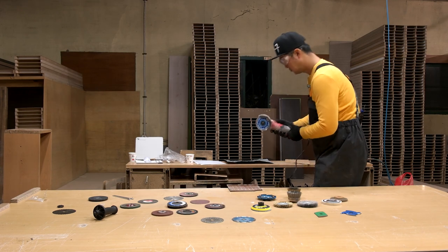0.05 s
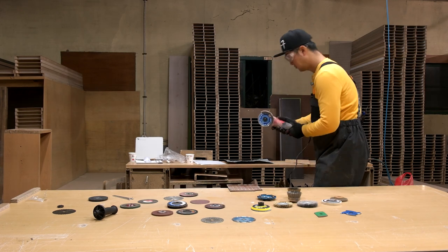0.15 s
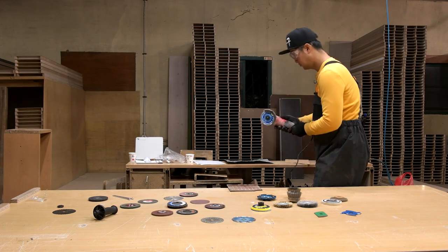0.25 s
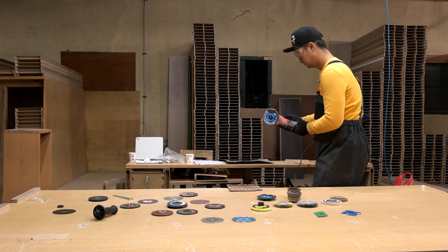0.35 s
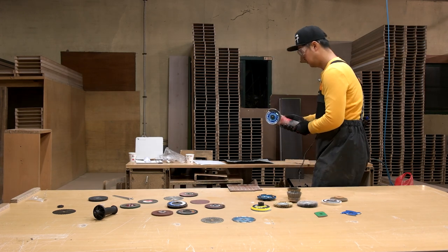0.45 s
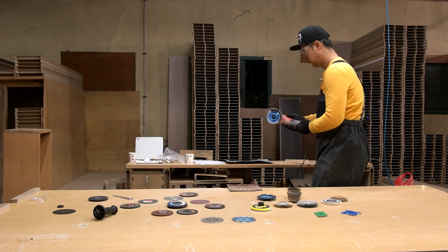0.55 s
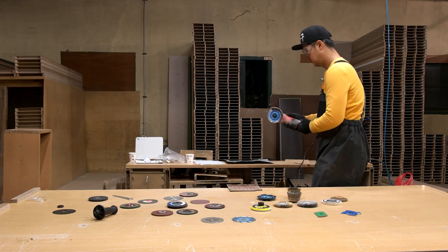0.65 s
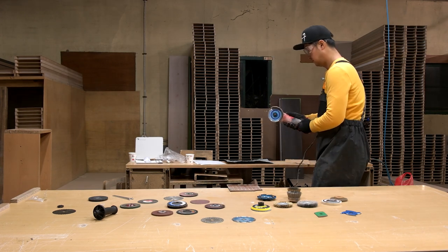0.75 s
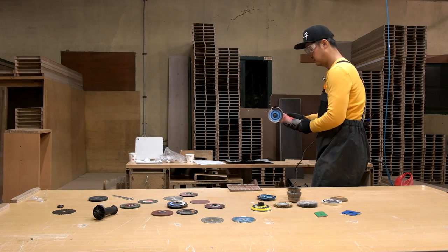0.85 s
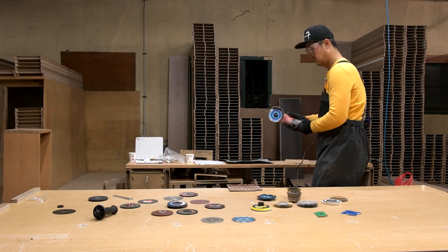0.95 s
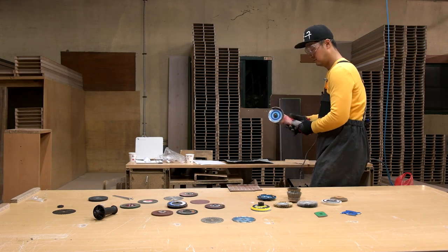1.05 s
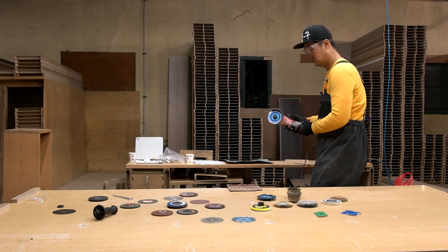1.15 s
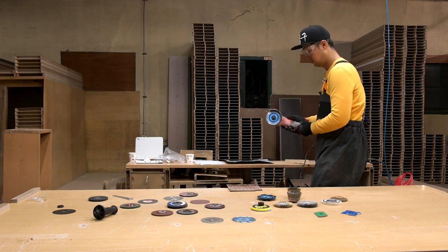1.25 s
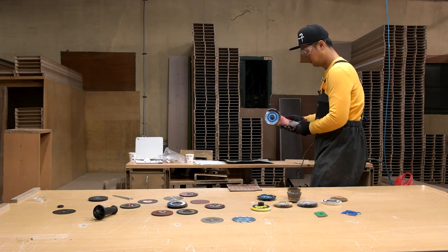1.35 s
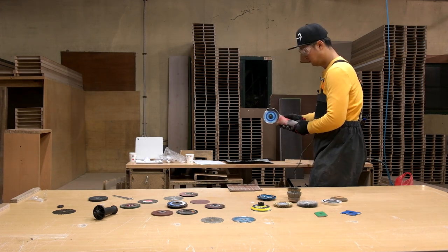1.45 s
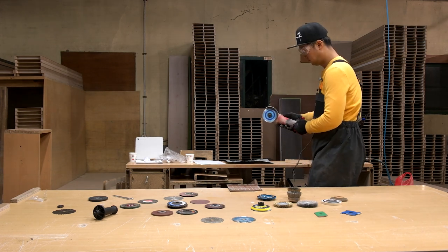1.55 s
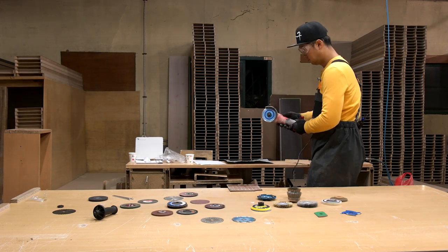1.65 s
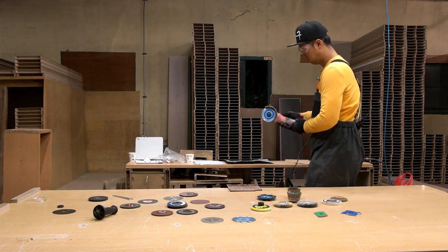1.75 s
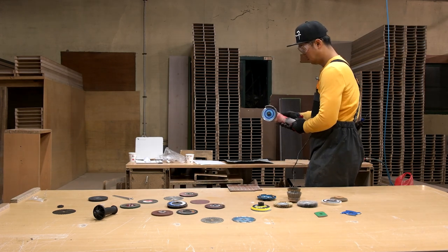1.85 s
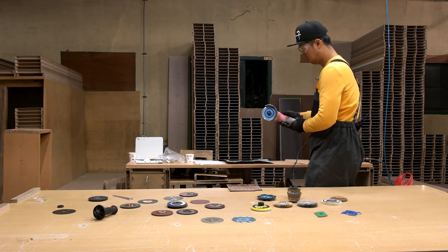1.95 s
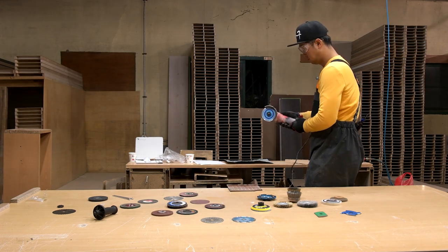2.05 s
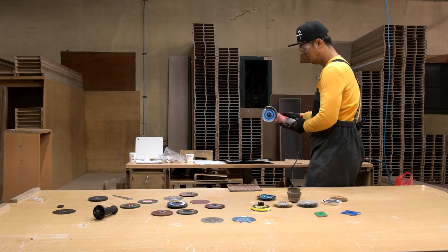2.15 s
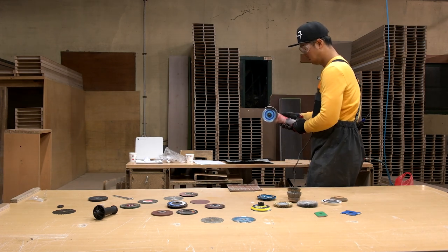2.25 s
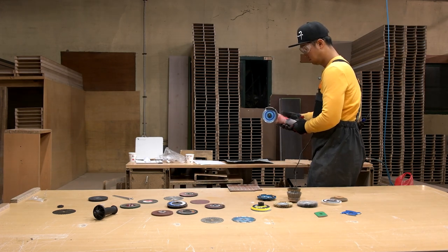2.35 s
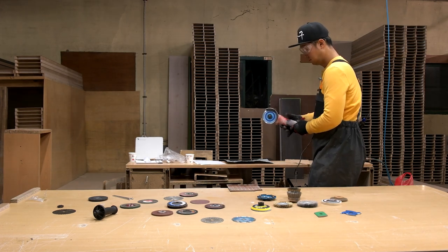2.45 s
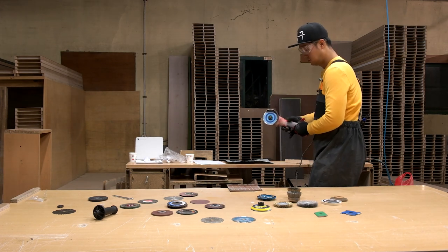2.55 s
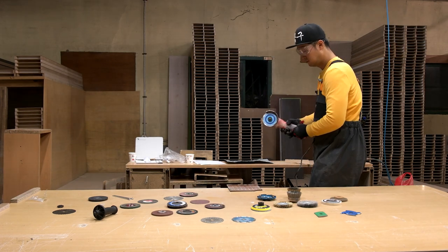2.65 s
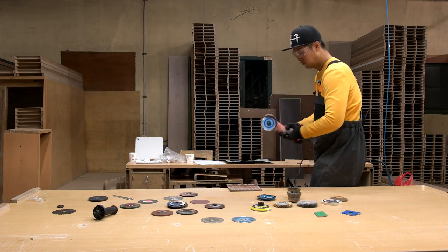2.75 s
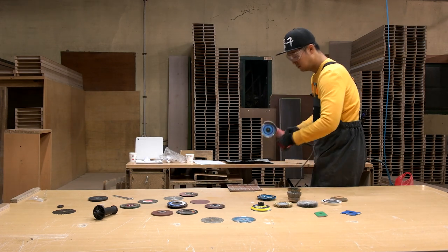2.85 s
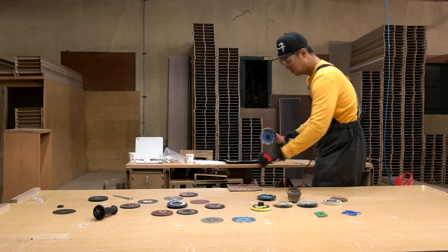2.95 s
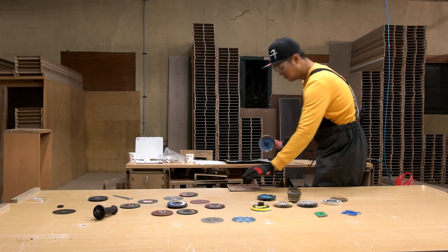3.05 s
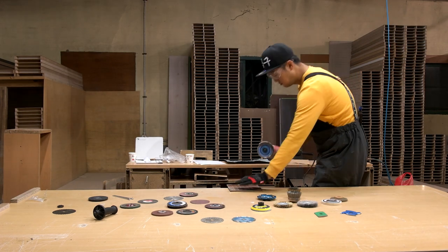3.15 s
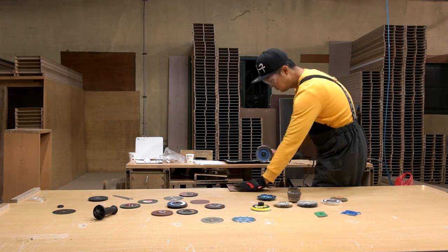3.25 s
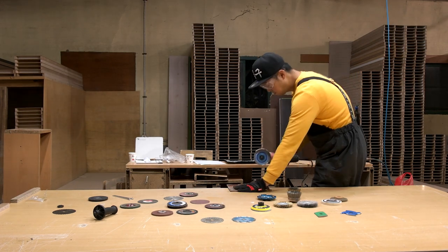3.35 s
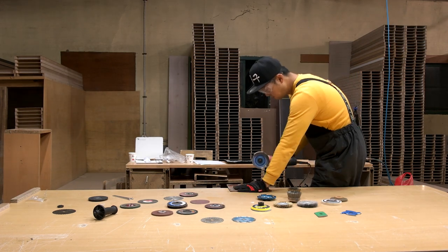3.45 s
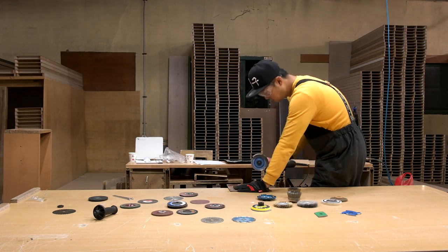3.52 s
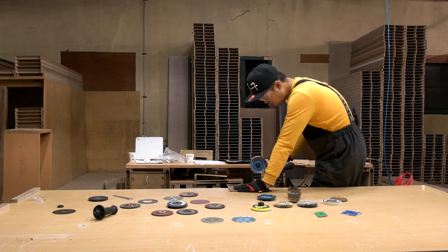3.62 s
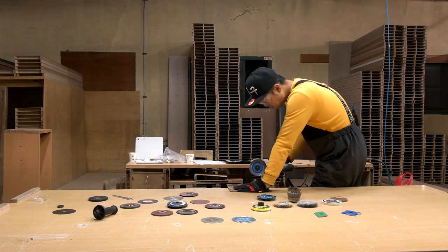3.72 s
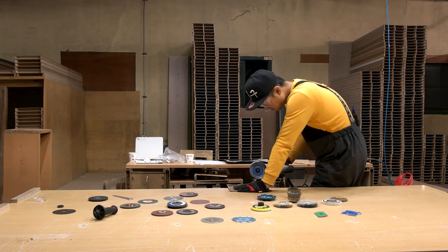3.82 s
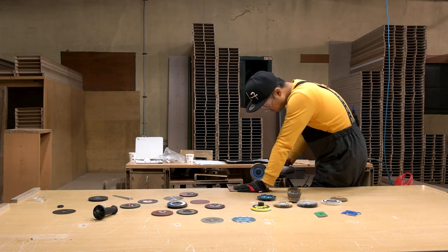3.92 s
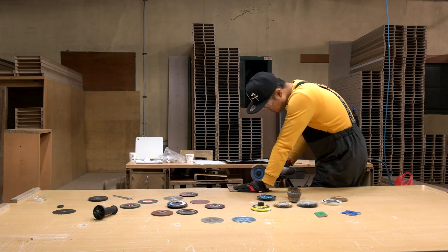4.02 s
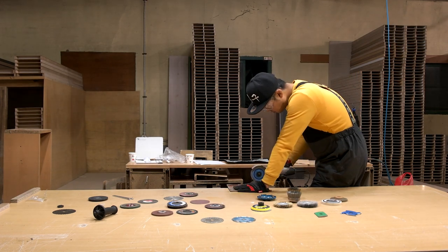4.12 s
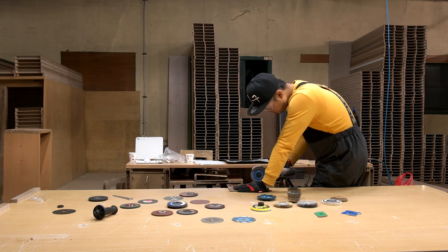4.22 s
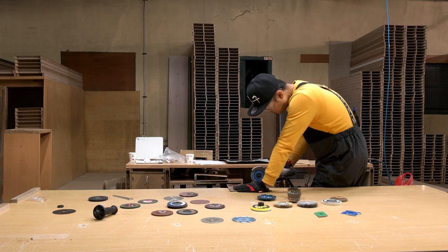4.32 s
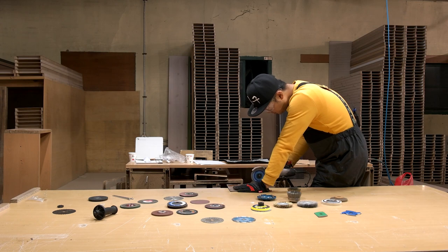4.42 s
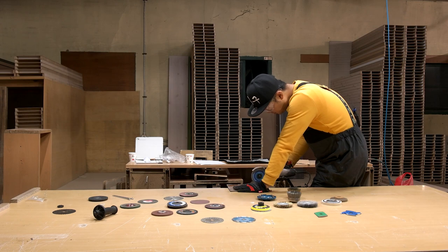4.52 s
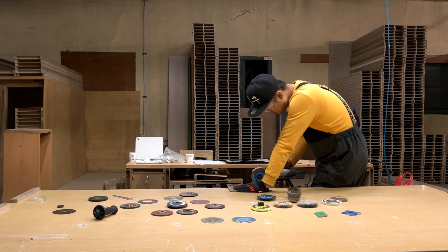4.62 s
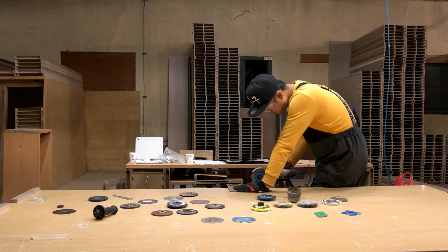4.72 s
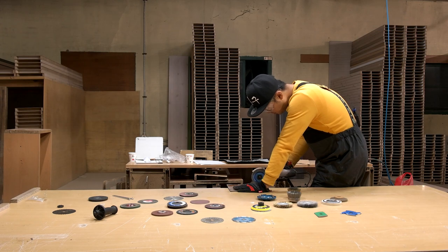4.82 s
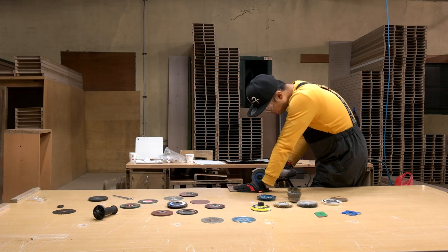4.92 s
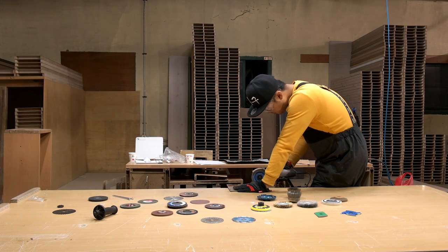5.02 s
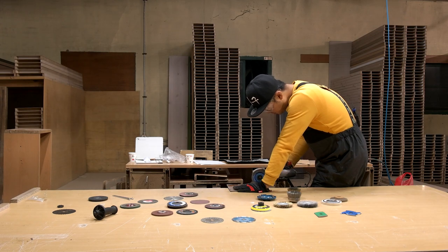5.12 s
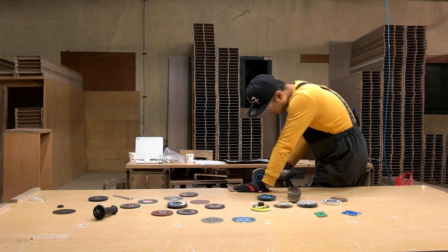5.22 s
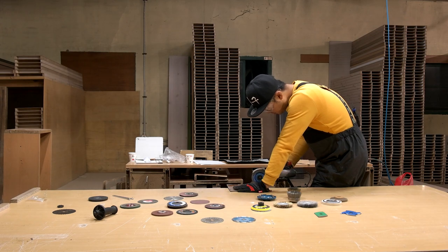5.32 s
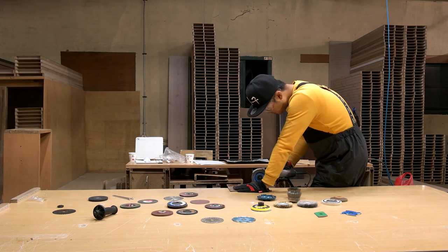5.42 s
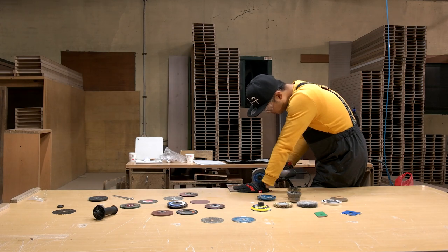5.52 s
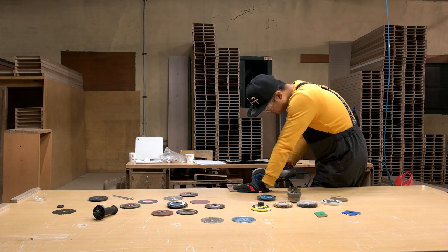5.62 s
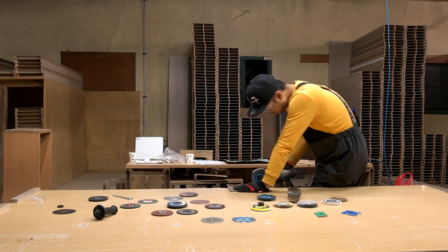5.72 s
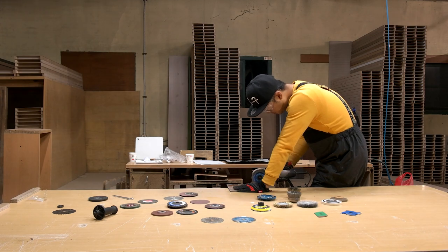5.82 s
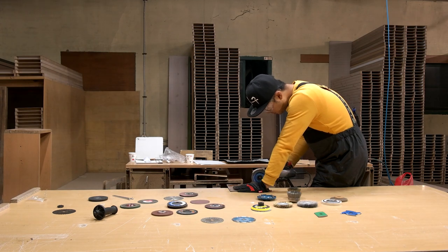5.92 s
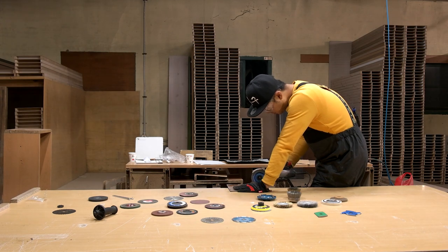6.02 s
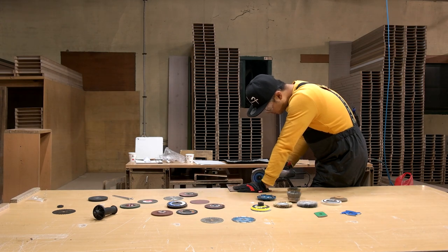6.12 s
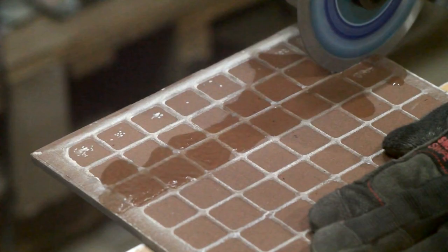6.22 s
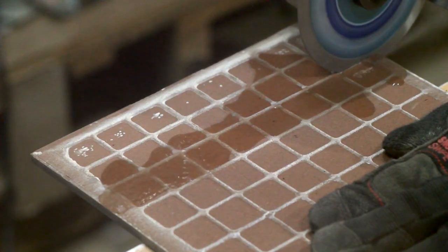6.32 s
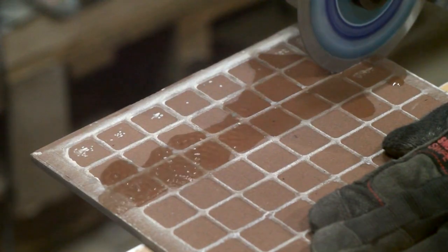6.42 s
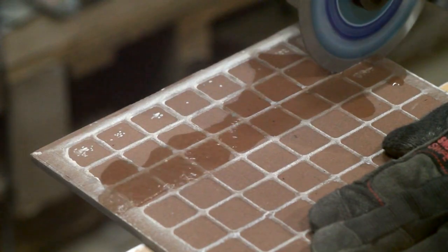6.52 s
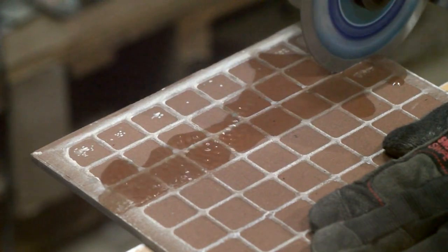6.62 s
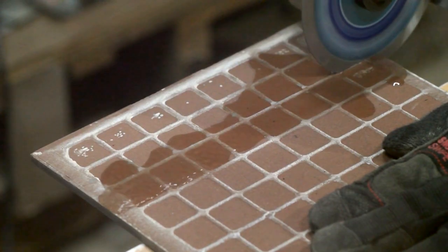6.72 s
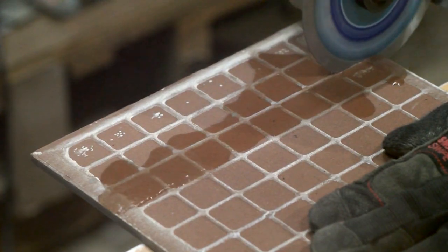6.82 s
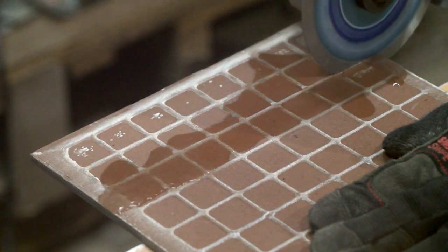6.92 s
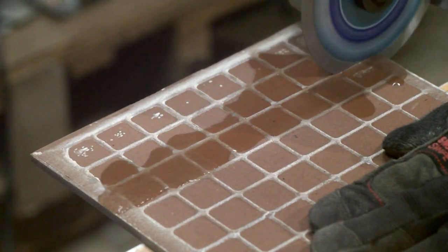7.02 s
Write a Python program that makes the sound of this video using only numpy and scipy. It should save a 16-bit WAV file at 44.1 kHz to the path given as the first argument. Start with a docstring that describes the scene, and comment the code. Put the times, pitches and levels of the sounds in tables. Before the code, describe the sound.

In a quiet workshop with faintly buzzing lamps, an angle grinder is blipped on and coasts with rattling gears. It restarts with sharp knocks and runs up to full speed, whining over a roaring fan. Then the disc bites into a wet tile, adding gritty scraping, ringing and high squeals. The stereo microphone is close, and the loudest peaks overload slightly.

```python
"""Angle grinder on wet tile

A workshop, a stereo microphone close to the tool. Lamps buzz faintly; the grinder is blipped on, coasts, is
switched on again and runs up to full speed. Its bevel gears clatter in their housing and whine, the fan roars,
then the diamond disc bites into a wet tile and rings. The loudest peaks are flattened."""
import sys
import numpy as np
from scipy import signal
from scipy.fft import rfft, irfft
from scipy.io import wavfile

SR = 44100
rng = np.random.default_rng(int(sys.argv[2]) if len(sys.argv) > 2 else 0)


def store_pcm(level_fs):
    """Save levels as 16-bit WAV."""
    pcm = np.round(np.clip(level_fs, -1, 1) * 32767).astype(np.int16)
    wavfile.write(sys.argv[1], SR, np.atleast_2d(pcm).T)


N = 311787
TIME = np.arange(N) / SR
FREQS = np.fft.rfftfreq(N, 1 / SR)

# room tone spectrum: f/Hz, level/dB
ROOM_TONE = [(18, -46), (30, -14), (108, -15), (284, -4), (431, -6.5), (727, -4.5), (873, -3), (944, -7),
             (1020, -4.5), (2010, -7.5), (2180, -8.5), (6360, -7.5), (15400, -16.5)]
# partials of the lamps: f/Hz, level/dB
LAMP_BUZZ = [(721.4, -71), (958.2, -68), (2040, -69), (3478, -70), (4560, -79), (5879, -72), (6121, -71),
             (6239, -73), (6358, -75), (6481, -64), (7321, -73), (7682, -79)]
# trigger held down: from t/s, to t/s
TRIGGER_HELD = [(.686, .9985), (1.899, 8)]
# hardest knocks as the gears take up their slack: t/s, level/dB
SLACK_KNOCKS = [(0.684, -3), (0.696, 14.5), (0.7042, 17.5), (0.7191, 20), (0.748, 15), (1.831, 5),
                (1.869, 13), (1.899, 26), (1.9061, 21.5), (1.915, 26)]
# gear clatter spectrum: f/Hz, level/dB
CLATTER_SPECTRUM = [(40, -71), (250, -29.5), (400, -18.5), (600, -9.5), (1000, -3.5), (2200, -1.5),
                    (4200, -6), (6000, -4), (8200, -6.5), (9500, -22), (13000, -21), (15500, -18.5)]
# gear housing resonances: f/Hz, width/Hz, boost/dB
HOUSING_MODES = [(423, 45, 4), (1030, 160, 4), (3980, 810, 6.5), (7290, 950, 7), (8330, 400, 8.5)]
# fan air spectrum: f/Hz, level/dB
FAN_SPECTRUM = [(88, -70), (150, -19.5), (427, -20), (453, -12.5), (572, -14.5), (606, -9), (1000, -7),
                (1220, -5), (1630, -2.5), (2920, -1.5), (4920, -6.5), (7250, -5), (8980, -11.5),
                (11800, -14.5), (15400, -23.5)]
# hum of the unbalanced rotor, loudest where the tool faces the microphone: t/s, level/dB
ROTOR_HUM = [(2.5, -57), (2.72, -31.5), (2.98, -28.5), (3.1, -40), (5.3, -37.5), (6.0, -41)]
# higher shaft orders at full speed: multiple, level/dB against the fan air
SHAFT_ORDERS = [(2, -20), (3, -26), (4, -27), (9, -32), (10, -31), (12, -27)]
# spectrum of grit on tile: f/Hz, level/dB
GRIT_SPECTRUM = [(60, -88), (260, -16.5), (500, -14), (1000, -10), (1600, -8.5), (2700, -2), (4200, -12.5),
                 (5200, -21), (6600, -12.5), (9500, -9.5), (12000, -13), (14500, -19), (15500, -38)]
# crowded disc modes that colour the scraping: f/Hz, width/Hz, boost/dB
SCREECH_MODES = [(2610, 130, 8), (4020, 200, 3), (8045, 90, 8), (10080, 170, 8), (11960, 130, 9),
                 (12400, 220, 5), (14680, 350, 10)]
# disc and tile ringing in the cut: f/Hz, level/dB
RING_MODES = [(1475, -30), (2186, -34), (2266, -26), (2622, -27), (2756, -31), (3015, -31), (3321, -33),
              (3644, -30), (3930, -31.5), (4021, -31), (4350, -35), (4753, -31), (6250, -31), (6740, -25),
              (7720, -24.5), (8037, -33), (8290, -37), (8963, -37), (9318, -39), (10072, -32.5),
              (10255, -34), (10621, -38), (11925, -35), (11999, -31), (12500, -40), (14110, -43),
              (14562, -41)]
# low ringing of the tile on the bench: f/Hz, level/dB
TILE_MODES = [(325, -43), (405, -43)]
# squeals as the kerf deepens: f/Hz, spread/Hz, from t/s, to t/s, level/dB
KERF_SQUEALS = [(3935, 45, 5.4, 6.15, -27.5), (4010, 200, 5.66, 6.08, -24.5), (2590, 110, 5.95, 6.7, -21.5),
                (2640, 80, 6.55, 7.2, -23), (3647, 12, 6.48, 6.84, -22), (4754, 12, 6.2, 6.8, -26.5),
                (6251, 15, 6.22, 6.8, -28), (6738, 18, 5.9, 7.2, -28), (10080, 90, 6.3, 7.2, -29)]
# stereo width at the microphone: f/Hz, side minus mid level/dB
STEREO_WIDTH = [(60, 9), (110, -21), (200, -8), (380, -12), (700, -12), (1290, -8), (2380, -3.5),
                (4400, -2), (8120, -1.5), (15000, -0.5)]

TOP_RPS, CRITICAL_RPS, CRITICAL_HALF_WIDTH_RPS = 611.3, 336, 42  # the tool shakes at the critical speed
BITE_S, BAND_EDGE_HZ = 5.45, 15620


def gain_of(db):
    """Decibels to amplitude."""
    return 10 ** (np.asarray(db) / 20)


def unit_rms(x):
    """Scales to rms 1."""
    return x / np.sqrt(np.mean(x ** 2) + 1e-20)


def curve(rows):
    """Joins (time, value) rows by straight lines."""
    return np.interp(TIME, *np.transpose(rows))


def ramp(start_s, rise_s):
    """Goes from 0 to 1 in a straight line."""
    return np.clip((TIME - start_s) / rise_s, 0, 1)


def lagging(switch, lag_s):
    """Follows a 0-1 switch with a lag."""
    keep = np.exp(-1 / (lag_s * SR))
    return np.clip(signal.lfilter([1 - keep], [1, -keep], switch), 0, 1)


def hump(x, centre, half_width):
    """A bell curve of height 1."""
    return np.exp(-((x - centre) / half_width) ** 2)


def spectrum_db(points, hz=FREQS):
    """Reads a spectrum on a log-frequency axis."""
    f, db = np.transpose(points)
    return np.interp(np.log(hz + 1), np.log(f + 1), db)


def boost_db(resonances, hz=FREQS):
    """Flat-topped humps of a set of resonances."""
    return sum(db / (1 + (2 * (hz - centre) / width) ** 4) for centre, width, db in resonances)


def rolloff_db(ratio, order=2):
    """A filter slope: flat below a ratio of 1, falling above it."""
    return -10 * np.log10(1 + ratio ** (2 * order))


def drift(hz):
    """Random wander of rms 1, mostly slower than hz."""
    steps = rng.standard_normal(16384)
    return unit_rms(np.interp(TIME * hz * 2, np.arange(len(steps)), steps))


def fuzzy_tone(angle, spread_hz, rough):
    """A tone of rms 1 with a skirt of noise around it."""
    skirt = drift(spread_hz) * np.cos(angle) + drift(spread_hz) * np.sin(angle)
    return unit_rms(np.cos(angle) + rough * skirt)


def stereo(mid, side, side_db):
    """Mid and side to left and right."""
    side = side * gain_of(side_db)
    return np.array([mid + side, mid - side])


def colour(pair, db):
    """Gives a mid-side pair a causal spectrum and spreads it: low mids narrow, treble wide."""
    cepstrum = irfft(np.log(gain_of(db)), N)
    cepstrum[1:N // 2] *= 2
    cepstrum[N // 2:] = 0
    mid, side = rfft(pair) * np.exp(rfft(cepstrum))
    return irfft(stereo(mid, side, spectrum_db(STEREO_WIDTH)), N)


def room(x, t60, wet_db):
    """Direct sound plus a scattered tail, different on each side of the microphone."""
    t = np.arange(SR // 2) / SR
    taps = rng.standard_normal((2, len(t))) * (rng.random((2, len(t))) < .05) * (t > .003)
    tail = taps * gain_of(-60 * t / t60)
    tail *= gain_of(wet_db) / np.linalg.norm(tail, axis=1, keepdims=True)
    wet = signal.fftconvolve(np.atleast_2d(x), tail, axes=1)[:, :N]
    return (x + wet) / np.sqrt(1 + gain_of(2 * wet_db))


def workshop(noise_db=-48, fade_db_per_s=9):
    """Faint room tone that dies down until the grinder starts, and the buzz of the lamps."""
    level_db = noise_db - fade_db_per_s * np.minimum(TIME, TRIGGER_HELD[0][0])
    noise = unit_rms(colour(rng.standard_normal((2, N)), spectrum_db(ROOM_TONE)))
    buzz = sum(gain_of(db) * np.sqrt(2) * np.cos(2 * np.pi * (hz * TIME + 0.71 * rng.random((2, 1))))
               for hz, db in LAMP_BUZZ)
    return noise * gain_of(level_db) + buzz


def shaft(pull_fade_rps=95, drag_per_turn=.00176, cut_sag_rps=7, step=44):
    """Speed (turns/s), drive (0 coasting, 1 powered) and strain (0 at full speed, 1 stalled)."""
    start_pull, friction = 13800, 17.5  # motor and bearings, turns/s^2
    on = sum((TIME >= start) & (TIME < end) for start, end in TRIGGER_HELD)
    # this much pull balances the losses at top speed
    holding = friction + drag_per_turn * TOP_RPS ** 2 - start_pull * np.exp(-TOP_RPS / pull_fade_rps)
    rps, speeds = 0., []
    for powered in on[::step]:
        pull = powered * (holding + start_pull * np.exp(-rps / pull_fade_rps))
        rps = max(rps + (pull - friction - drag_per_turn * rps ** 2) * step / SR, 0)
        speeds.append(rps)
    free_speed = np.interp(TIME, TIME[::step], speeds)
    speed = free_speed - cut_sag_rps * ramp(BITE_S, 0.98)
    strain = lagging(on, lag_s=.022) ** 2 * np.maximum(1 - free_speed / TOP_RPS, 0)
    return speed, lagging(on, lag_s=.008), strain


def knock_strength(speed, drive, strain, running_db=-18, strain_db=-5.5, coasting_db=-11):
    """The teeth knock hardest under strain and at the critical speed, loosely while coasting."""
    driven = drive ** 2 * (gain_of(running_db) + gain_of(strain_db) * strain ** 0.93)
    loose = (1 - drive) ** 2 * gain_of(coasting_db) * (speed / CRITICAL_RPS) ** 0.29
    turning = np.minimum(speed / 110, 1)
    shake_db = 4.5 * hump(speed, CRITICAL_RPS, CRITICAL_HALF_WIDTH_RPS)
    return turning * driven * gain_of(shake_db) + loose


def gear_clatter(turns, speed, strain, knock, gear_ratio=3.4, knocks_per_turn=1.8, uneven_db=9,
                 rasp_db=-1, bell_hz=2750, bell_width_hz=310, hard_rps=370):
    """Teeth knock unevenly over a rasp, harder once in each turn of the disc, and ring the housing."""
    hits = rng.random(N) < knocks_per_turn * speed / SR
    sizes = gain_of(uneven_db * np.minimum(rng.exponential(1, N), 3)) * rng.choice([-1, 1], (2, N))
    force = unit_rms(unit_rms(hits * sizes) + gain_of(rasp_db) * rng.standard_normal((2, N)))
    throb_db = 3.2 * np.cos(2 * np.pi * turns / gear_ratio)
    force *= knock * gain_of(throb_db)
    for at_s, db in SLACK_KNOCKS:
        force[:, round(at_s * SR)] += gain_of(db)
    force = room(force, t60=0.31, wet_db=2.5)
    # slow, soft knocks ring mostly the main bell mode; faster ones clatter over the whole range
    hardness = .25 + .75 * np.clip(speed / hard_rps, 0, 1) ** 1.3
    clatter = colour(force * hardness, spectrum_db(CLATTER_SPECTRUM) + boost_db(HOUSING_MODES))
    bell_db = 8.5 + np.maximum(rolloff_db(2 * (FREQS - bell_hz) / bell_width_hz, order=3), -90)
    bell = colour(force * gain_of(7 * np.minimum(strain, .5)), bell_db)
    return (clatter + bell) * (speed > 0)


def pinion_whine(turns, speed, drive, strain, teeth=12, flare_hz=4350):
    """Meshing teeth: a whine that flares in the housing resonances, and a broad rasp under strain."""
    angle, mesh_hz = 2 * np.pi * teeth * turns, teeth * speed
    whine = fuzzy_tone(angle, spread_hz=290, rough=8)
    whine *= gain_of(-23) * hump(mesh_hz, flare_hz, 700) * (1 - drive + 2 * strain)
    octave = fuzzy_tone(2 * angle, spread_hz=450, rough=8)
    octave *= gain_of(boost_db(HOUSING_MODES, 2 * mesh_hz) - 20) * drive * hump(speed, 322, 43)
    rasp = fuzzy_tone(angle, spread_hz=950, rough=14)
    rasp *= (speed / TOP_RPS) ** 2.3 * (gain_of(-9) * np.sqrt(strain) + gain_of(-27) * drive)
    return room(whine + octave + rasp, t60=0.055, wet_db=-5)


def airflow(speed, drive, level_db=-7.5, shield_db_per_s=2.1):
    """Fan level: about speed squared, more when the tool shakes, less as the disc sinks into the tile."""
    shake_db = 2.5 * drive * hump(speed, CRITICAL_RPS, CRITICAL_HALF_WIDTH_RPS)
    shield_db = shield_db_per_s * np.maximum(TIME - BITE_S, 0)
    return (speed / TOP_RPS) ** 2.26 * gain_of(level_db + shake_db - shield_db)


def fan(turns, air, turns_per_throb=3.8, low_cut_hz=350):
    """Air rushes through the vents and past the disc, fluttering as it turns."""
    flutter_db = 0.82 * drift(120) + 0.5 * drift(10) + 0.3 * np.cos(2 * np.pi * turns / turns_per_throb)
    rush = room(gain_of(flutter_db) * rng.standard_normal((2, N)), t60=0.44, wet_db=-7.5)
    shape_db = spectrum_db(FAN_SPECTRUM) + rolloff_db(low_cut_hz / (FREQS + 1))
    return unit_rms(colour(rush, shape_db)) * air


def tool_body(speed, rumble_top_hz=230, drone_hz=440):
    """The body rumbles, most at the critical speed or facing the microphone; its lowest mode drones."""
    rumble = unit_rms(colour(rng.standard_normal((2, N)), rolloff_db(FREQS / rumble_top_hz)))
    shake = gain_of(-63 + 10 * hump(speed, CRITICAL_RPS, 11)) * speed / CRITICAL_RPS
    facing = gain_of(curve(ROTOR_HUM) - 14) * (speed / TOP_RPS) ** 2
    drone = fuzzy_tone(2 * np.pi * drone_hz * TIME, spread_hz=25, rough=2.5)
    return rumble * (shake + facing) + drone * gain_of(-38) * hump(speed, 408, 150)


def motor(turns, speed, strain, air, whistle_order=34, flare_hz=14700):
    """Rotor hum, shaft orders that emerge near full speed, and a whistle that flares in a resonance."""
    angle, speed_share = 2 * np.pi * turns, speed / TOP_RPS
    hum = gain_of(curve(ROTOR_HUM)) * fuzzy_tone(angle, spread_hz=9, rough=0.46) * speed_share ** 2
    orders = sum(gain_of(db) * fuzzy_tone(k * angle, spread_hz=8, rough=0.98) for k, db in SHAFT_ORDERS)
    orders *= speed_share ** 8 * air
    whistle_hz = whistle_order * speed
    in_band = (whistle_hz > 7000) & (whistle_hz < BAND_EDGE_HZ + 500)
    whistle_db = -33 - 12 * (2 * strain) ** 4 + 10 * hump(whistle_hz, flare_hz, 1200)
    whistle = gain_of(whistle_db) * in_band * fuzzy_tone(whistle_order * angle, spread_hz=200, rough=1.7)
    return hum + orders + room(whistle, t60=0.13, wet_db=3)


def disc_pressure(graze_db, graze_s=4.95, rock_hz=3.62, first_push_s=5.57, deepen_db_per_s=2.65):
    """The disc grazes the tile, bites suddenly, then cuts deeper as the hand rocks it to and fro."""
    graze = gain_of(graze_db) * ramp(graze_s, 0.25)
    rocking_db = 0.9 * np.cos(2 * np.pi * rock_hz * (TIME - first_push_s))
    bite = ramp(BITE_S, 0.046) * gain_of(deepen_db_per_s * (TIME - BITE_S) + rocking_db)
    return np.maximum(bite, graze)


def scraping(level_db=-13, burst_db=5.5, low_cut_hz=220):
    """Diamond grit scrapes the tile in uneven bursts and sets the disc screeching."""
    bursts = room(gain_of(burst_db * drift(200)) * rng.standard_normal((2, N)), t60=0.083, wet_db=2)
    shape_db = spectrum_db(GRIT_SPECTRUM) + boost_db(SCREECH_MODES) + rolloff_db(low_cut_hz / (FREQS + 1))
    return unit_rms(colour(bursts, shape_db)) * gain_of(level_db) * disc_pressure(graze_db=-13)


def ringing(level_db=1):
    """The scraping keeps the modes of disc and tile ringing; the high ones waver faster."""
    modes = np.zeros((2, N))
    for hz, db in list(RING_MODES) + list(TILE_MODES):
        angles = 2 * np.pi * (hz * TIME + rng.random((2, 1)))
        mid, side = (fuzzy_tone(angle, spread_hz=11 + .002 * hz, rough=.85) for angle in angles)
        modes += gain_of(db) * stereo(mid, side, spectrum_db(STEREO_WIDTH, hz) - 2)
    return modes * gain_of(level_db) * disc_pressure(graze_db=-16)


def squeals(swell_s=0.1):
    """The disc sticks and slips in the kerf, feeding first one of its modes and then another."""
    mid_side = np.zeros((2, N))
    for hz, spread_hz, start, end, db in KERF_SQUEALS:
        swell = gain_of(db) * ramp(start, swell_s) * (1 - ramp(end - swell_s, swell_s))
        angles = 2 * np.pi * (hz * TIME + rng.random((2, 1)))
        mid_side += [swell * fuzzy_tone(angle, spread_hz, rough=1.3) for angle in angles]
    return stereo(*mid_side, side_db=-4)


def scene(speed_jitter=0.00206):
    """At the microphone: the grinder, its speed trembling a little, the cut and the room around them."""
    speed, drive, strain = shaft()
    turns = np.cumsum(speed * (1 + speed_jitter * drift(40))) / SR
    air, knock = airflow(speed, drive), knock_strength(speed, drive, strain)
    gearbox = gear_clatter(turns, speed, strain, knock) + pinion_whine(turns, speed, drive, strain)
    grinder = gearbox + fan(turns, air) + motor(turns, speed, strain, air) + tool_body(speed)
    return grinder + scraping() + squeals() + ringing() + workshop()


def record(dry, knee=15):
    """The loudest peaks are flattened; a steep filter takes off the top treble."""
    clipped = dry / (1 + abs(dry) ** knee) ** (1 / knee)
    low_pass = signal.firwin(511, BAND_EDGE_HZ, window=("kaiser", 9), fs=SR)
    return signal.oaconvolve(clipped, low_pass[None], "same")


dry = scene()
out = record(dry)
store_pcm(out)
```